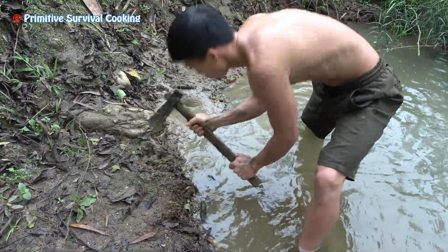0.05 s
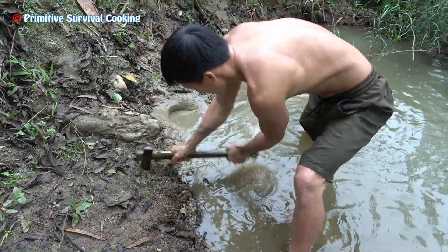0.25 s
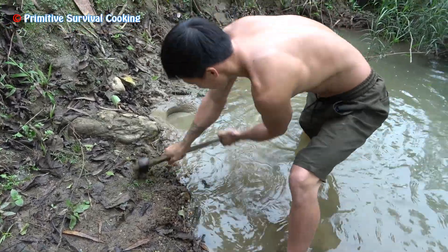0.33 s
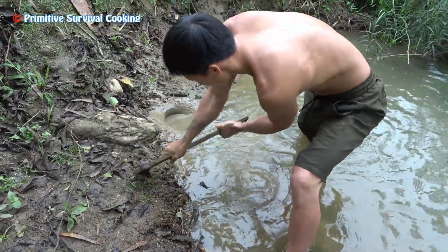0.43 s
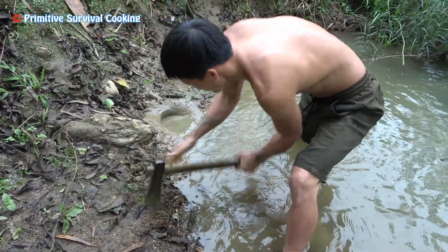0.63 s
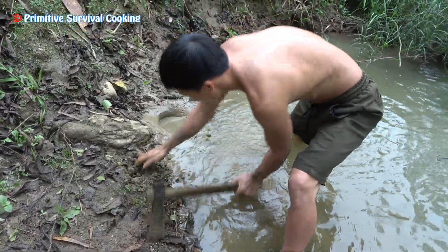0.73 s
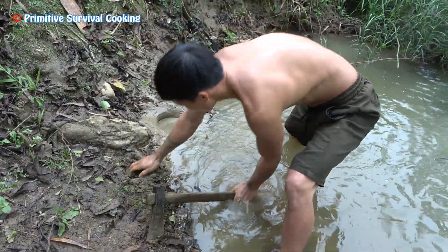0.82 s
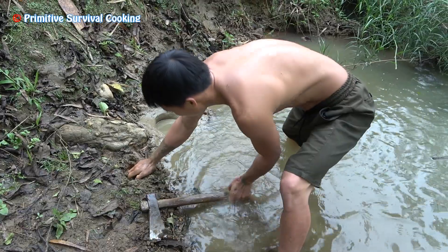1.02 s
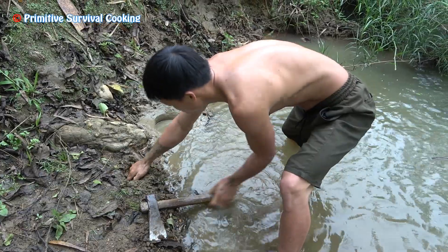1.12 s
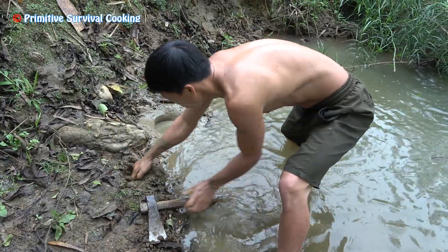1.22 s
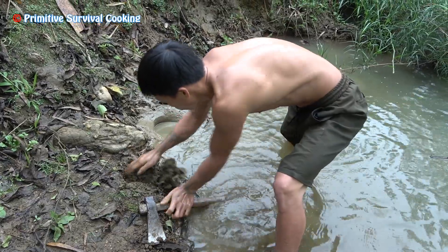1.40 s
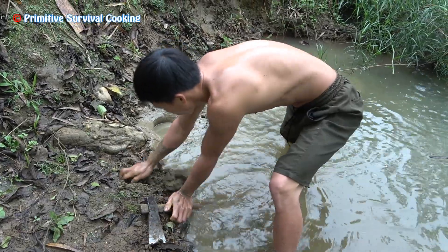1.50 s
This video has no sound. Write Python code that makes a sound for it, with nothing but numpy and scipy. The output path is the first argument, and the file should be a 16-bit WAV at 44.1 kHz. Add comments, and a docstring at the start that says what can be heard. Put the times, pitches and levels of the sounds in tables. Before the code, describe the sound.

One hard hoe strike in wet mud, followed by gritty scraping and small splashes.

```python
"""A muddy river bank, with the river's hiss and a low wind behind the work.
A hoe cuts in and knocks hard on something buried, its ring deadened by the mud; the peak overloads.
The blade is dragged out, singing as grit rubs the steel, and set down with a clink. Then hands slap
and push wet mud, air pockets plop and the shallow water trickles. The bank returns a short echo."""
import sys
import numpy as np
from scipy import signal
from scipy.fft import rfft, irfft, next_fast_len
from scipy.io import wavfile
from scipy.ndimage import uniform_filter1d

SR = 44100
rng = np.random.default_rng(int(sys.argv[2]) if len(sys.argv) > 2 else 0)


def to_wav(s):
    """Save 16-bit WAV."""
    ch = np.atleast_2d(s).T  # columns
    pcm = np.round(np.clip(ch, -1, 1) * 32767)  # PCM
    wavfile.write(sys.argv[1], SR, pcm.astype(np.int16))


N = 68355
T = np.arange(N) / SR

# Tone of each noise layer: f/Hz, level/dB
WIND_EQ = [(12, 1.5), (38, -4.5), (60, -14.5), (110, -24), (1000, -37)]
RIVER_EQ = [(30, -34), (280, -1.5), (600, 2), (1300, 5.5), (2500, -10), (6000, -17.5), (10000, -21),
            (16000, -62)]
WATER_EQ = [(100, -75), (350, -14), (650, -1.5), (1200, -4.5), (2200, 0), (4500, -0.5), (8000, -5.5),
            (16000, -22)]
MUD_EQ = [(60, -44), (250, -8.5), (650, 0.5), (1400, 1), (2600, -3.5), (5000, -9), (8000, -16),
          (12000, -27), (16000, -34)]
PAT_EQ = [(30, -14), (170, 1.5), (400, -0.5), (2000, -58)]
GRIT_EQ = [(150, -42), (600, -18.5), (1300, -4.5), (2800, -6.5), (5000, 3.5), (7500, 0.5), (10000, -6),
           (13000, -16.5), (16000, -20)]
# Tone of the bank's echo and of the stereo side signal: f/Hz, level/dB
ECHO_EQ = [(100, -26), (300, -19.5), (550, -17.5), (950, -10.5), (1500, -28), (2400, -18.5), (3500, -25),
           (16000, -42)]
SIDE_EQ = [(250, -28), (1000, -46.5), (2500, -32.5), (5000, -15), (14000, -11.5)]
# Length of the echo: f/Hz, t60/s
ECHO_DECAY = [(200, 0.13), (2400, 0.87), (14000, 0.12)]
# Fader ride of the stirred water: t/s, level/dB
STIR_LEVELS = [(0, -50.5), (.15, -55), (.3, -39.5), (.46, -48.5), (.56, -48), (.67, -45.5), (.74, -52),
               (.87, -42.5), (.96, -43.5), (1.06, -39.5), (1.17, -44), (1.29, -42.5), (1.335, -46.5),
               (1.39, -42.5), (1.43, -45.5), (1.55, -36.5)]
# Air pockets in mud and water: t/s, f/Hz, level/dB, decay/s, glide/(octaves per s)
PLOPS = [(.008, 523, -38, .011, -5.5), (.328, 690, -32.5, 0.0069, 11), (.521, 790, -34.5, 0.0069, 3),
         (.857, 921, -38, 0.022, -3.5), (.887, 1400, -30, 0.0033, -3), (.898, 1146, -31.5, 0.0079, -13),
         (0.9376, 4250, -20, 0.0025, 9), (0.975, 1120, -35, 0.01, 0), (1.027, 640, -19.5, 0.0033, 8),
         (1.036, 854, -35, 0.0088, 8), (1.093, 605, -39.5, 0.014, 15), (1.111, 737, -35.5, 0.036, 34),
         (1.197, 1162, -33.5, 0.01, 2.5), (1.238, 1149, -31, 0.018, 4), (1.267, 3640, -29, 0.004, -7),
         (1.27, 1264, -28.5, 0.0045, -19), (1.366, 4760, -23, 0.0034, 29), (1.371, 1394, -30.5, 0.0064, -7)]
# Wet mud slapped, dropped or squeezed: peak t/s, rise/s, fall/s, level/dB, bass/dB, treble/dB
MUD_SPLATS = [(0.233, 0.0083, 0.0086, -19.5, 11.5, 5.5), (0.244, 0.011, 0.012, -25, 7, -32),
              (0.284, 0.032, 0.038, -31, -8, -14), (0.379, 0.01, 0.011, -27, -15, -38),
              (0.393, 0.018, 0.014, -34, 20, -25), (0.91, 0.0033, 0.0022, -30.5, -13, -46),
              (0.9373, 0.00045, 0.023, -35.5, -6, 19), (1.017, 0.011, 0.0031, -20.5, -28, 13.5),
              (1.021, 0.0078, 0.0097, -21, 0.5, 11), (1.098, 0.0055, 0.015, -30, -45, 6),
              (1.215, 0.028, 0.013, -38, -18, -10), (1.272, 0.014, 0.014, -34, -54, -15),
              (1.367, 0.0003, 0.011, -33.5, -22, -1), (1.535, 0.076, 0.031, -43, -5, 22.5)]
# Dull pats of tool and hand on the bank: t/s, level/dB
GROUND_PATS = [(.18, -47), (0.844, -44), (1.216, -39.5)]
# Steel sliding through grit: peak t/s, rise/s, fall/s, level/dB, blade ring/dB, lowest mode boost/dB
SCRAPE_STROKES = [(0.2, 0.0071, 0.0061, -25, -10, 16), (.227, 0.0077, 0.0076, -19.5, -20, 0),
                  (.284, 0.0035, 0.038, -41, -14, 10), (0.39, 0.032, 0.035, -35.5, -1, 5.5),
                  (0.459, .008, 0.014, -46, 5.5, 16), (0.596, 0.04, 0.017, -38, 1, -6.5),
                  (0.651, .005, 0.017, -47, 10, 3), (0.821, 0.023, 0.031, -28.5, -7, -2),
                  (0.8275, 0.0005, 0.0014, -19, -23, 0), (0.834, 0.0091, .0042, -16, -14.5, -14),
                  (.99, 0.038, 0.011, -40, 5, -5)]
# Modes of the free blade: f/Hz, struck level/dB, t60/s, rubbed level/dB
BLADE_MODES = [(2392, -4.5, 0.07, 0.5), (4797, -6, 0.027, 2.5), (5714, 5, 0.022, -1),
               (7700, -15, 0.13, -21), (9960, -13, 0.048, -15), (12070, -17, .03, -11)]
# The bare blade touches stones: t/s, level/dB
BLADE_CLINKS = [(0.7735, -41), (0.7773, -11.5)]
# Modes of the hoe held by the mud: f/Hz, level/dB, t60/s
KNOCK_MODES = [(478, -14, 0.019), (576, -13.5, 0.027), (689, -12.5, 0.023), (898, -14, 0.019),
               (1038, -15.5, 0.025), (1400, -15, 0.019), (2267, -5, 0.011), (2470, 1.5, 0.01),
               (4200, -10.5, 0.0095), (9370, -41, 0.12)]

BASS_HZ, TREBLE_HZ = 490, 3140  # shelf corners
GRAINS_PER_S, GRAIN_SPREAD_DB = 4500, 3.5
CROWD_DB = -36.5  # bursts louder than this hold more grains
CATCH_DB, CATCH_S = 2, 0.00605  # grit catches and slips: depth and length of the jerks


def amp(db):
    """Decibels to gain."""
    return 10 ** (np.asarray(db) / 20)


def unit(x):
    """Scales to rms 1."""
    return x / np.sqrt(np.mean(x ** 2) + 1e-20)


def read(points, hz):
    """Reads a curve along log frequency."""
    f, value = np.transpose(points)
    return np.interp(np.log(hz + 1), np.log(f + 1), value)


def colour(x, points, bass_db=0, treble_db=0):
    """Applies an EQ curve with bass and treble shelves."""
    size = next_fast_len(len(x) + 2048)
    hz = np.fft.rfftfreq(size, 1 / SR)
    bass = bass_db / (1 + (hz / BASS_HZ) ** 2)
    treble = treble_db * hz ** 2 / (hz ** 2 + TREBLE_HZ ** 2)
    return irfft(rfft(x, size) * amp(read(points, hz) + bass + treble), size)[:len(x)]


def noise():
    """White noise."""
    return rng.standard_normal(N)


def wander(seconds):
    """Smooth random modulation of rms 1 on the given time scale."""
    lowpass = np.exp(-(np.fft.rfftfreq(N, 1 / SR) * seconds) ** 2)
    return unit(irfft(rfft(noise()) * lowpass, N))


def grains(db=CROWD_DB):
    """Tiny uneven clicks in a little smooth hiss; db sets only their density."""
    size = amp(GRAIN_SPREAD_DB * np.minimum(rng.exponential(1, N), 3))
    rate = GRAINS_PER_S * amp(max(db - CROWD_DB, 0))
    clicks = size * rng.choice([-1., 1.], N) * (rng.random(N) < rate / SR)
    return unit(unit(clicks) + 0.27 * noise())


def swell(s, rise, fall):
    """An envelope that peaks at time s, then dies away."""
    return np.exp(-np.maximum((s - T) / rise, (T - s) / fall))


def add(mix, s, sound):
    """Mixes a sound in at time s."""
    part = mix[max(round(s * SR), 0):][:len(sound)]
    part += sound[:len(part)]


def wind(db=-44):
    """A low, steady rumble of air."""
    return amp(db) * unit(colour(noise(), WIND_EQ))


def river(db=-47.5):
    """A midrange bed of flowing water."""
    return amp(db) * unit(colour(noise(), RIVER_EQ))


def bank_echo(x, near_db=3, near_t60=0.033):
    """Quick reflections from the ground and a thin, longer tail from the bank."""
    hz, t, spectrum = signal.stft(noise()[:SR // 2], SR, nperseg=256)
    far = amp(-60 * t / read(ECHO_DECAY, hz)[:, None])
    near = amp(near_db - 60 * t / near_t60)
    tail = signal.istft(spectrum * (far + near) * (t > 0), SR, nperseg=256)[1]
    return colour(signal.fftconvolve(x, tail / np.linalg.norm(tail))[:N], ECHO_EQ)


def scattered(x):
    """Close scatter smears the sound over a few milliseconds."""
    scatter = noise()[:400] * np.linspace(1, 0, 400)
    return signal.fftconvolve(x, scatter / np.linalg.norm(scatter))[:N]


def bubble(hz, decay, glide, flutter_db=2.26, rise_s=0.00043):
    """An air pocket rings with a sliding, wobbling pitch and flutters as it is squeezed."""
    t = T[:SR // 10]
    # small pockets are the least steady
    wobble = 0.026 * hz / 1000 * unit(uniform_filter1d(noise()[:len(t)], 50))
    flutter = unit(amp(flutter_db * wander(CATCH_S)[:len(t)]))
    pitch = np.minimum(hz * 2 ** np.minimum(glide * t, 2) * (1 + wobble), SR / 2)
    envelope = np.exp(-(t / decay) ** 2 / 2) * (1 - np.exp(-t / rise_s))
    return flutter * envelope * np.sin(2 * np.pi * np.cumsum(pitch) / SR)


def drips(per_s=300, pitches=30, low_hz=610.6, high_hz=6990, spread_db=5, tilt_db_per_octave=4):
    """A trickle of tiny bubbles, the high ones shorter and stronger."""
    out = np.zeros(N)
    for hz in np.geomspace(low_hz, high_hz, pitches):
        uneven_db = spread_db * np.minimum(rng.exponential(1, N), 3)
        size = amp(uneven_db + tilt_db_per_octave * np.log2(hz / low_hz))
        triggers = size * (rng.random(N) < per_s / pitches / SR)
        decay = 6.43 / hz  # the same number of cycles at every pitch
        glide = rng.uniform(-1.65, 3.36) * 0.127 / decay
        out += signal.oaconvolve(triggers, bubble(hz, decay, glide))[:N]
    return unit(out)


def droplets(per_s=70):
    """Sparse bright ticks of flung droplets on wet mud."""
    return unit(colour(noise() * (rng.random(N) < per_s / SR), GRIT_EQ))


def water():
    """Stirred shallows: single plops over fine splashing, drips and droplets."""
    plops = np.zeros(N)
    for s, hz, db, decay, glide in PLOPS:
        add(plops, s, amp(db) * bubble(hz, decay, glide))
    trickle = amp(-5.5) * drips()
    splashing = unit(colour(grains(), WATER_EQ)) + trickle + amp(-10.5) * droplets()
    return plops + amp(np.interp(T, *np.transpose(STIR_LEVELS))) * splashing


def mud():
    """Mud splats in bursts of wet grains; tool and hand pat the ground softly."""
    out = np.zeros(N)
    for s, rise, fall, db, bass_db, treble_db in MUD_SPLATS:
        out += unit(colour(grains(db), MUD_EQ, bass_db, treble_db)) * amp(db) * swell(s, rise, fall)
    for s, db in GROUND_PATS:
        out += unit(colour(noise(), PAT_EQ)) * amp(db) * swell(s, rise=0.0057, fall=0.006)
    return out


def rubbed_blade(drive, low_db, detune_hz=129.4):
    """Rubbing feeds the blade's modes; shifting mud detunes them, the higher ones less."""
    t, out = T[:SR // 8], np.zeros(N)
    for k, (hz, _, t60, db) in enumerate(BLADE_MODES):
        mode = amp(db + low_db * (k == 0) - 60 * t / t60) * np.exp(2j * np.pi * hz * t)
        drift_hz = detune_hz / (k + 1) * wander(CATCH_S)
        detune = np.exp(2j * np.pi * np.cumsum(drift_hz) / SR)
        out += (signal.fftconvolve(drive, mode)[:N] * detune).real
    return unit(out) * np.std(drive)


def scrapes():
    """Grit crackles along the steel in jerks and makes it sing roughly."""
    out = np.zeros(N)
    for s, rise, fall, db, ring_db, low_db in SCRAPE_STROKES:
        jerk_db = CATCH_DB * amp(min(CROWD_DB - db, 0))  # loud strokes run smoother
        stroke = amp(db) * swell(s, rise, fall) * unit(amp(jerk_db * wander(CATCH_S)))
        crackle = unit(colour(grains(db), GRIT_EQ)) * stroke
        out += crackle + amp(ring_db) * rubbed_blade(grains(db) * stroke, low_db)
    return out


def strike(modes, crack_db, crack_s, rise_s=0.00032):
    """A short crack of contact and the modes it sets ringing."""
    t = T[:SR // 4]
    body = sum(amp(db - 60 * t / t60) * np.sin(2 * np.pi * hz * t) for hz, db, t60, *_ in modes)
    crack = unit(colour(noise(), GRIT_EQ))[:len(t)] * amp(crack_db) * np.exp(-t / crack_s)
    return (body + crack) * (1 - np.exp(-t / rise_s))


def clinks(sink_s=0.037):
    """The freed blade rings on stones until the mud closes on it and chokes the tail."""
    out = np.zeros(N)
    for s, db in BLADE_CLINKS:
        clink = strike(BLADE_MODES, crack_db=-12.5, crack_s=0.012)
        choke = np.exp(-(T[:len(clink)] / sink_s) ** 2 / 2)
        add(out, s, amp(db) * clink * choke)
    return out


def hoe_knock(at_s=0.2367, knock_db=7.5, thud_db=-15, thud_s=0.00064):
    """The main hit: a hard, deadened knock in the bank, with one push of the ground for weight."""
    out = np.zeros(N)
    add(out, at_s, amp(knock_db) * strike(KNOCK_MODES, crack_db=-1, crack_s=0.00076))
    push = T[:SR // 10] / thud_s
    add(out, at_s, amp(thud_db) * push * np.exp(1 - push))
    return out


def scene():
    """The work and river sit near the centre; echo and wind spread wider around them."""
    work = hoe_knock() + clinks() + scrapes() + mud() + water()
    flow, rumble = river(), wind()
    side_wind = amp(-1.5) * wind()
    side = colour(scattered(work + flow) + amp(23.5) * bank_echo(work), SIDE_EQ) + side_wind
    mid = work + bank_echo(work) + flow + rumble
    return np.array([mid + side, mid - side])


def record(dry):
    """The loudest peak overloads with a rounded knee; a steep low-pass trims the top."""
    ceiling, cutoff_hz = 1.5, 15850
    clipped = dry / (1 + (dry / ceiling) ** 8) ** (1 / 8)
    lowpass = signal.firwin(511, cutoff_hz, window=("kaiser", 9), fs=SR)
    return signal.oaconvolve(clipped, lowpass[None], "same", axes=1)


dry = scene()
out = record(dry)
to_wav(out)
```